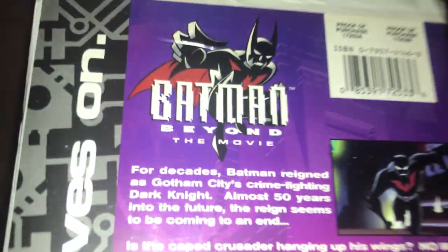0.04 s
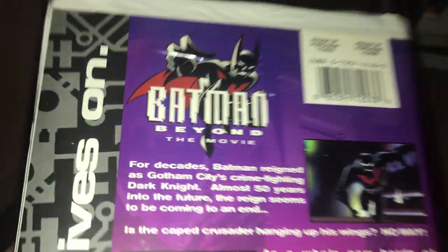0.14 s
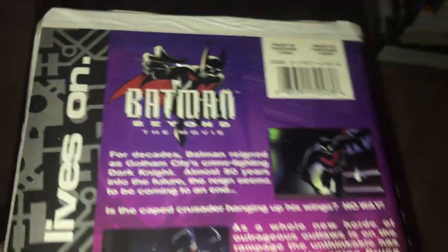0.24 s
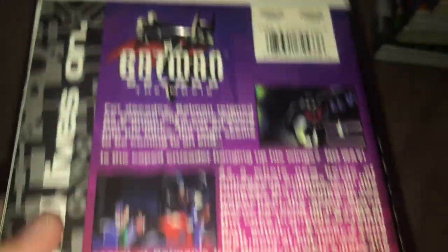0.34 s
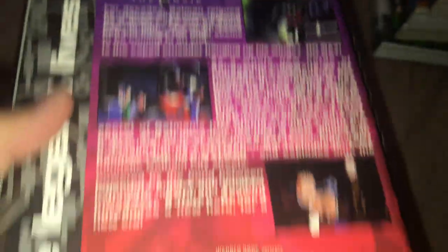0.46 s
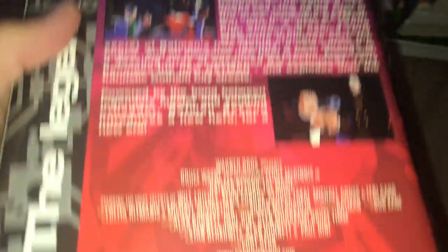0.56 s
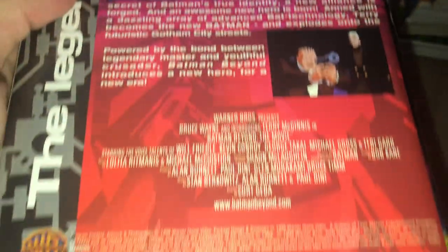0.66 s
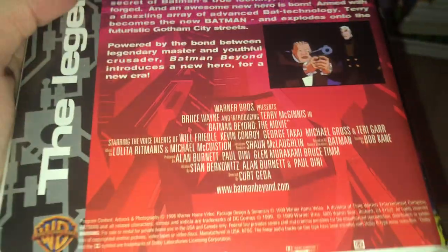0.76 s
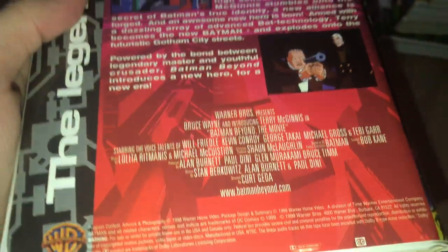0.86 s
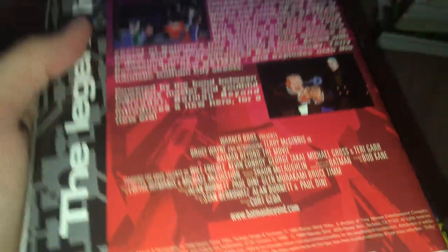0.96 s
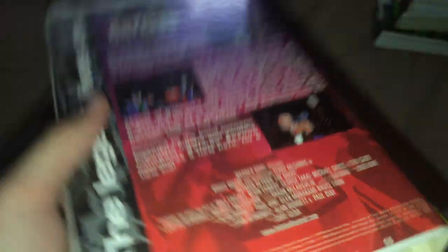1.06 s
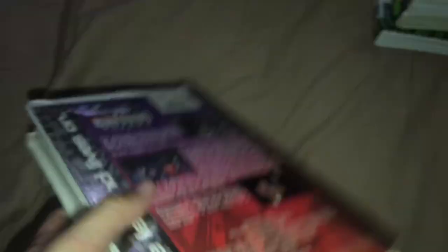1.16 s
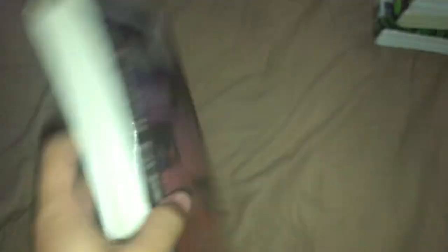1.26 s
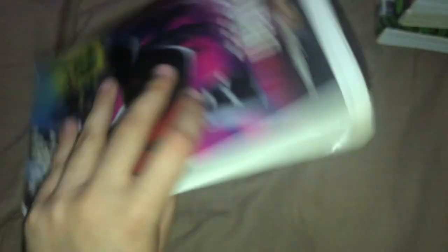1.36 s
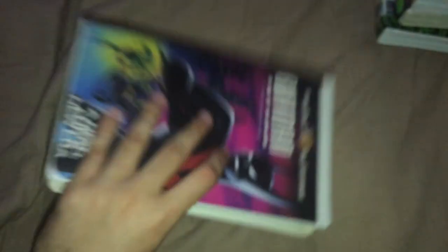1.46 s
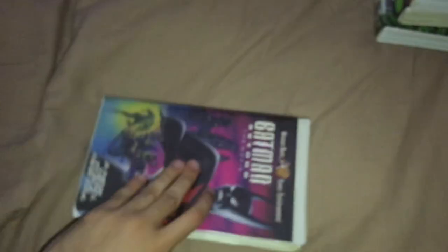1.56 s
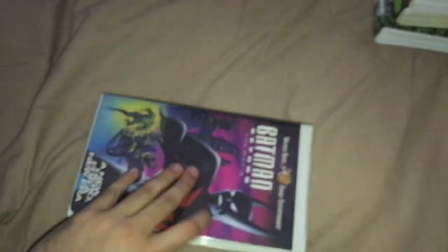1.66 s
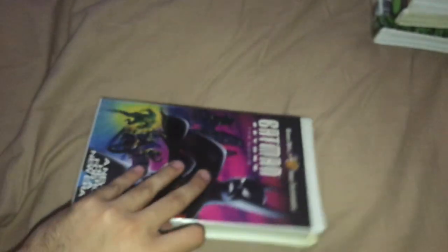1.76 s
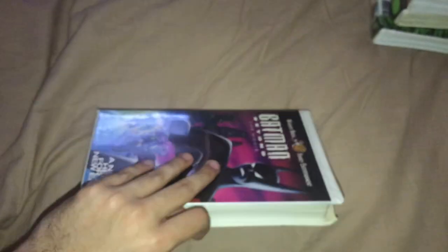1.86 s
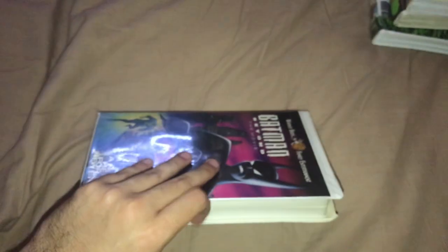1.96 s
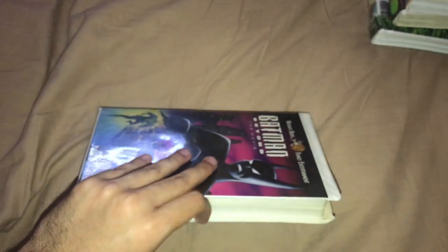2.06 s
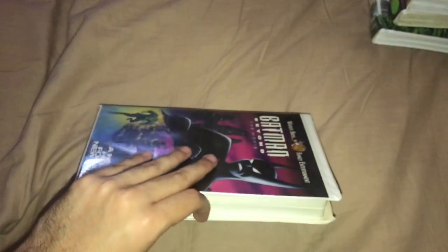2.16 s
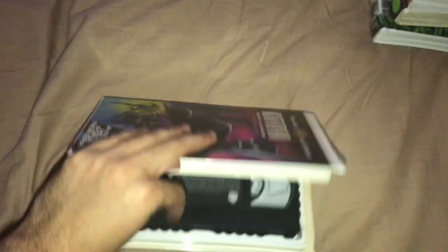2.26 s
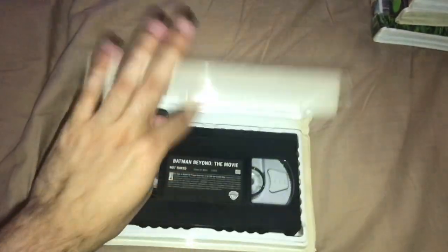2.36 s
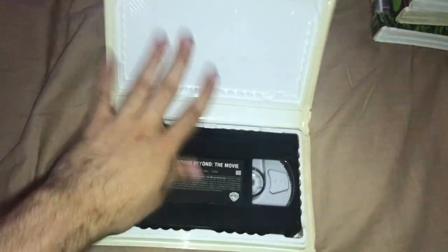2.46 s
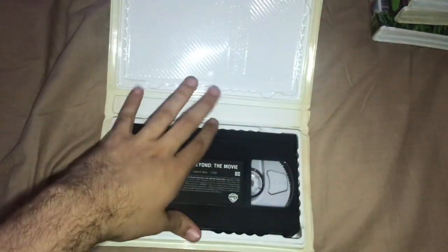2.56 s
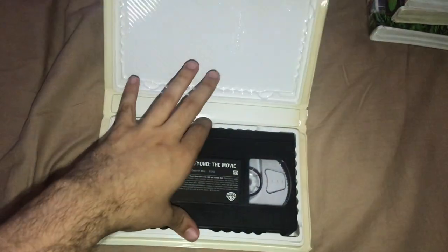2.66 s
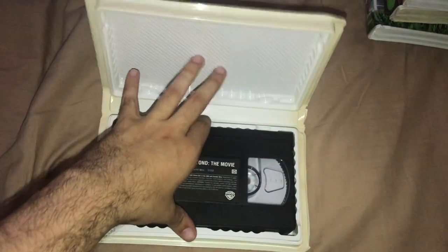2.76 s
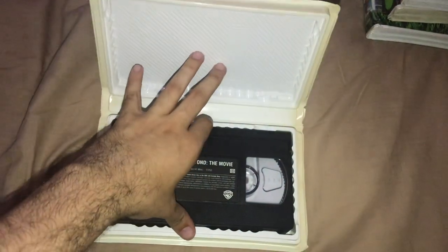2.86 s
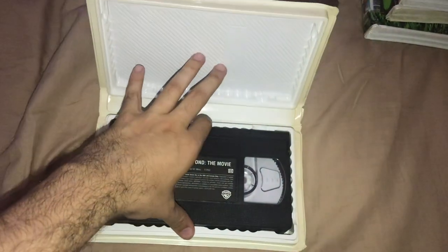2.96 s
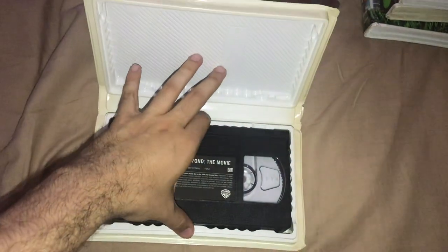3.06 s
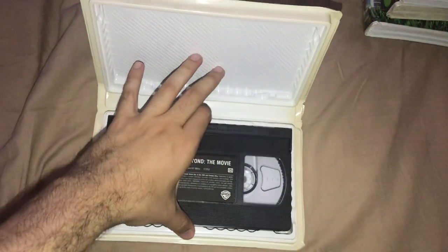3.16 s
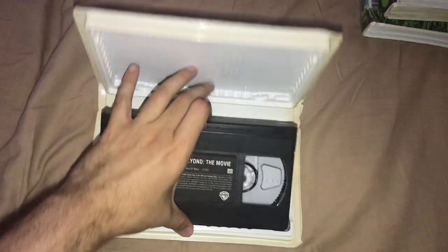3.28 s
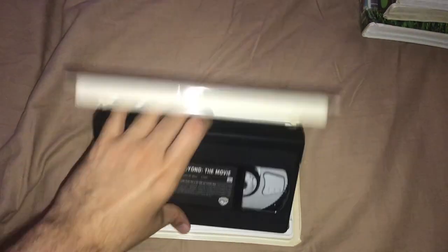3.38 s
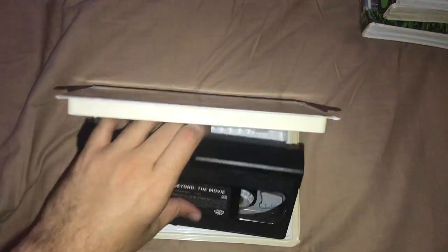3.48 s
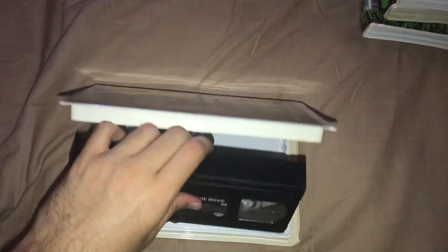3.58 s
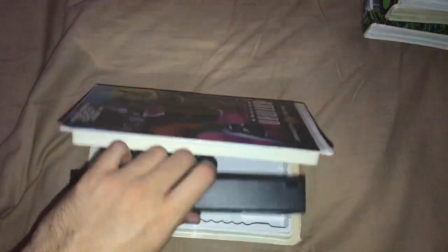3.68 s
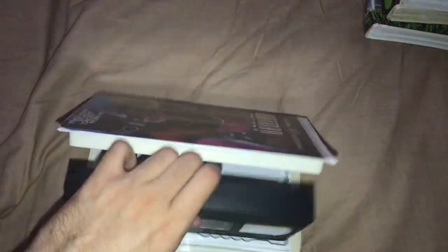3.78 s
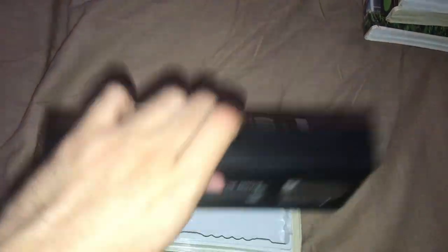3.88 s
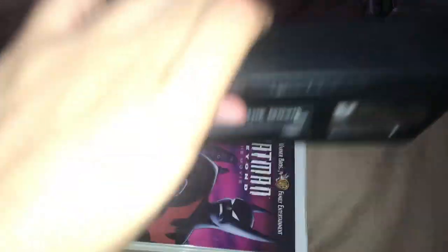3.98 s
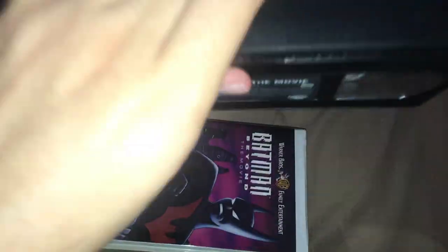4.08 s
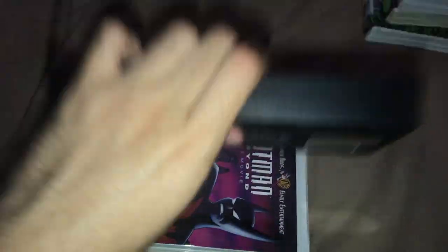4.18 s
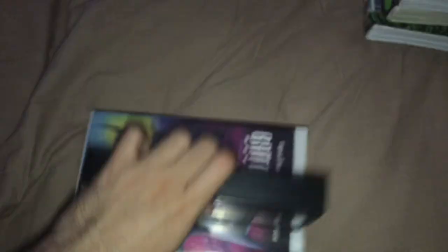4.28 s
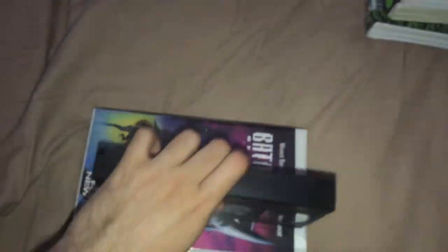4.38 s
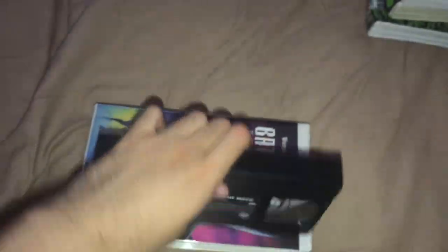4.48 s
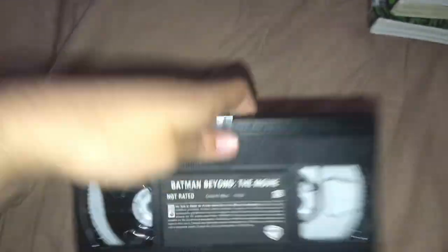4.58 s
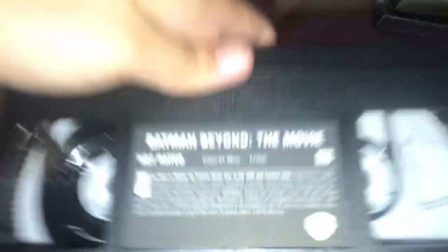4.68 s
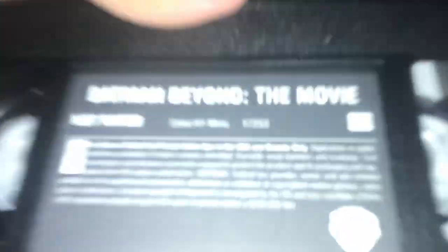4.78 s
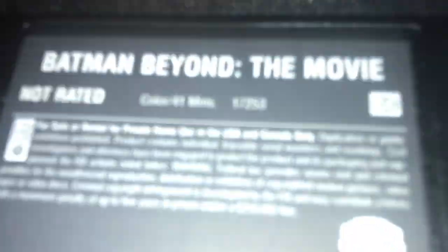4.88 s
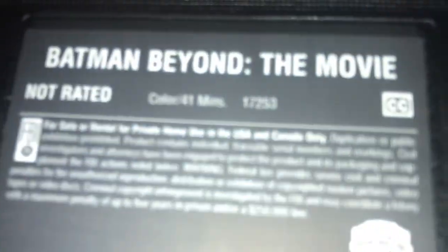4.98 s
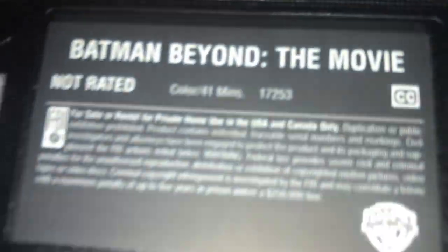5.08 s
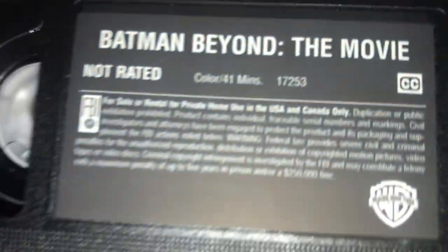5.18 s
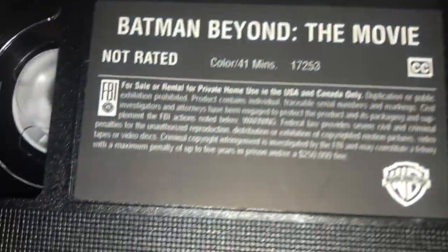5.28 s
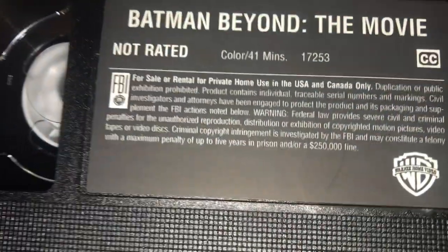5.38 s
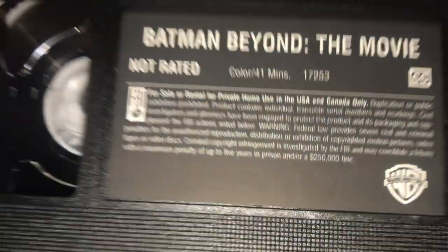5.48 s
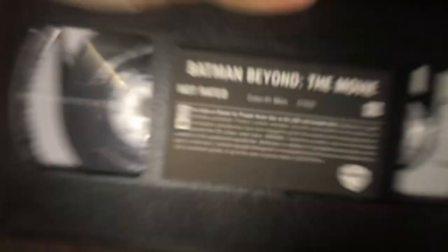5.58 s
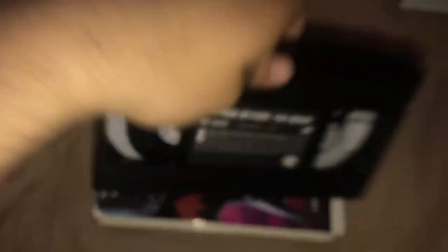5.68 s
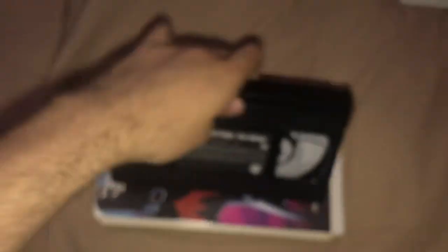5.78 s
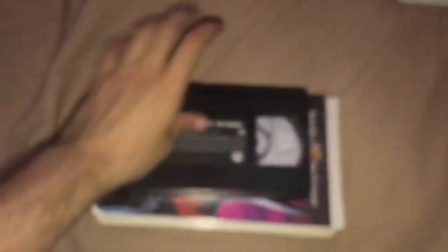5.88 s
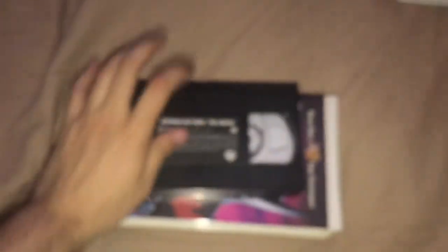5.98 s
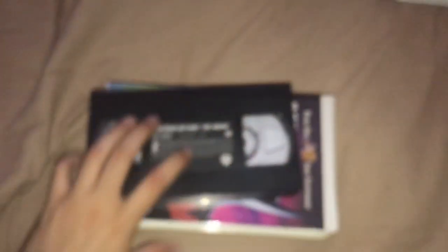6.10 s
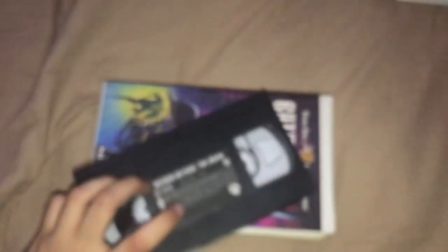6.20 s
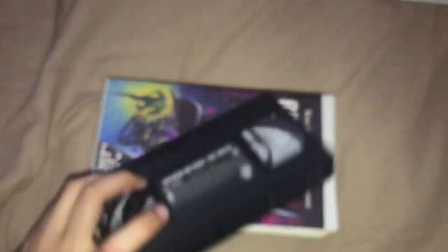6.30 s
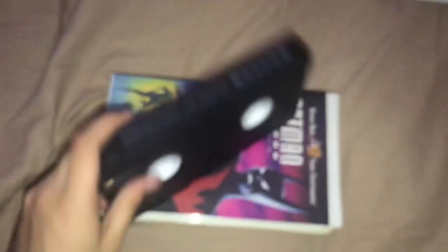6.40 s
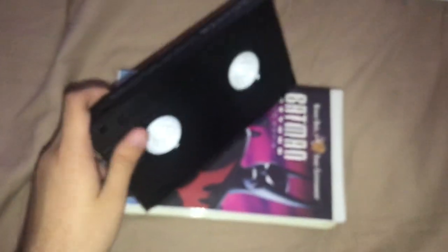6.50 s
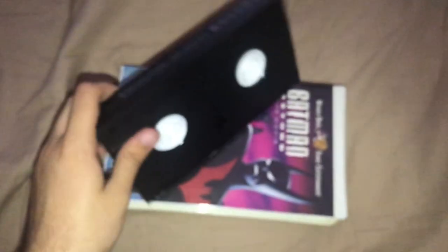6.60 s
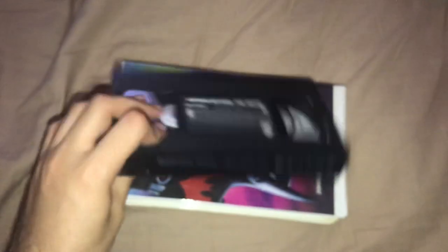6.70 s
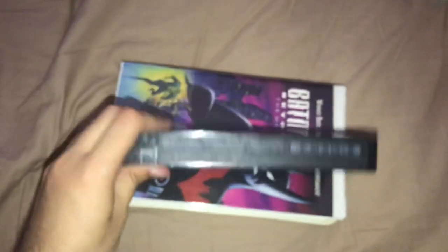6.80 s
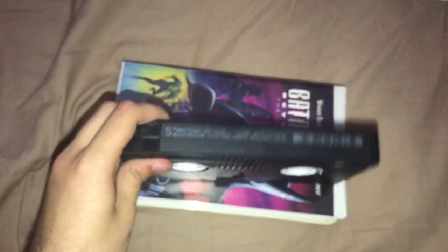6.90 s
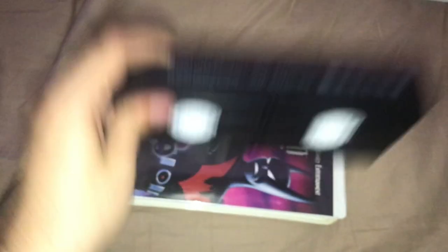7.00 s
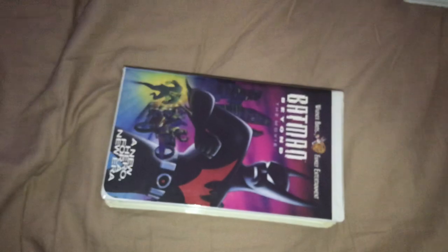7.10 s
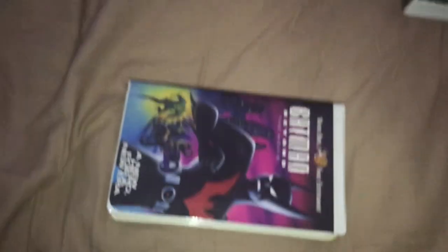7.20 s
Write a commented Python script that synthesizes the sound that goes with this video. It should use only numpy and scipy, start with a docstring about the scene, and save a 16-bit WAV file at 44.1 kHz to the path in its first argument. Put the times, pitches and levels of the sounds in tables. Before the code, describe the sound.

Plastic video case is laid on a bed and popped open, then a cassette is lifted out, knocked on the lid and turned, reels rattling.

```python
"""A low wavering hum and small creaks of gripped plastic come first. On a bed in a small room, a hand lays down
a soft plastic video case, pops it open, pulls out the tape cassette, shuts the lid, and knocks and turns the
cassette on top of it. Each blow is a burst of tiny contacts that excites the damped modes of a plastic shell;
between the blows, friction noise of plastic, skin and cloth swells and ebbs, and loose reels rattle."""
import sys
import numpy as np
from scipy import signal
from scipy.fft import rfft, irfft, next_fast_len
from scipy.io import wavfile
from scipy.ndimage import uniform_filter1d

SR = 44100
rng = np.random.default_rng(int(sys.argv[2]) if len(sys.argv) > 2 else 0)


def file_out(sig):
    """Save sig as 16-bit WAV at sys.argv[1]."""
    # one column per channel
    cols = np.atleast_2d(sig).T
    # limit, then scale
    lim = np.clip(cols, -1, 1)
    pcm = np.round(lim * 32767).astype(np.int16)
    wavfile.write(sys.argv[1], SR, pcm)


N = 319725
TIME = np.arange(N) / SR
RING_TIME = TIME[:8192]
TOP_HZ = 16000

# Blows on the cassette. Each row: start in seconds, contact time in seconds, strength in dB,
# brightness in dB per octave, thud on the mattress in dB re strength.
TAPE_BLOWS = [(3.473, 0.0051, -42.5, 0, -10), (3.495, 0.0094, -34, -.5, -3.5), (3.802, 0.01, -39.5, -1, -8),
              (3.811, 0.0012, -42.5, 4, -29), (4.057, 0.0058, -47, -0.5, -19),
              (4.085, 0.00077, -33, -0.8, -22), (4.38, 0.028, -23, -2.5, -0.5),
              (4.39, 0.0018, -13, -0.66, -9.5), (4.449, 0.0029, -31, -2, -12), (5.87, 0.0018, -25, -3, -3),
              (5.892, 0.0063, -19, -1.5, -7.5), (5.9825, 0.0092, -21.5, 1, -1),
              (6.428, 0.0028, -44, 0.5, -24), (6.464, 0.0032, -29, 2, -38), (6.499, 0.0073, -33, 0.7, -2),
              (6.509, 0.0034, -27, 1.55, -24), (6.54, 0.0027, -32, 0.5, -26),
              (6.749, 0.0032, -27.5, 0.07, -2), (6.758, 0.002, -32.5, 1.3, -4), (6.777, 0.003, -36, 1, -25),
              (6.818, 0.0028, -37, 5, -26), (6.832, 0.0015, -36.5, 2, -35), (6.897, 0.0059, -27, 2, -17),
              (6.9047, 0.0026, -24, 2, -24), (6.921, 0.0039, -35, 1, -4.5), (7.078, 0.0007, -48, 5, -16)]
# Modes of the case, then of the cassette. Each row: frequency in Hz, relative level in dB,
# decay time t60 in seconds; pitch and level scatter around these from blow to blow.
CASE_MODES = [(127, -1.5, 0.11), (283, 7.5, 0.043), (334, 12.5, 0.029), (520, 6, 0.024), (1200, 0.5, 0.17),
              (1460, 11.5, 0.013), (2440, 6.5, 0.09)]
TAPE_MODES = [(256.5, -2, 0.019), (498.5, 6, 0.016), (640, 2, 0.032), (730, -4.5, 0.06), (1728, 1, 0.037),
              (2333, 2, 0.052), (2770, -8, 0.079), (3730, 10.5, 0.02), (3830, -0.5, 0.06)]
# Spectrum of the crowd of short-lived shell modes. Each row: frequency in Hz, relative level in dB.
SHELL = [(80, -18), (300, 2), (560, 9.5), (1000, -6), (1400, 4), (4200, -1), (7000, -12.5), (15500, -16)]
# Ranges of panel, clack and tick at neutral brightness. Each row: low edge in Hz, high edge in Hz.
RANGES = [(270, 840), (1100, 5000), (5000, 16000)]
# After each blow the surfaces skid: delay and spread in s, dB re the blow before the common gains,
# hiss in dB re the scrape before the common gains.
SKID_DELAY_S, SKID_SPREAD_S, SKID_DB, SKID_HISS_DB = 0.016, 0.02, -18, -9.5


def undb(db):
    """Amplitude gain from decibels, by the definition 20 log10."""
    return 10 ** (np.asarray(db) / 20)


def unit(x):
    """Normalisation to unit mean power: rms 1."""
    return x / np.sqrt(np.mean(x ** 2))


def crest(x, db, size=265):
    """Short-time level: the loudest few milliseconds are scaled to this rms level."""
    return x * undb(db) / np.sqrt(uniform_filter1d(x ** 2, size).max())


def band(x, lo_hz, hi_hz, order=3):
    """Causal band-pass with the maximally flat Butterworth response."""
    edges = [lo_hz, min(hi_hz, SR / 2 - 1)]
    return signal.sosfilt(signal.butter(order, edges, "band", fs=SR, output="sos"), x)


def noise(points, count, ripple_db=0):
    """Spectral shaping: white noise filtered to (Hz, dB) points plus chance peaks and valleys, at rms 1."""
    hz, db = np.transpose(points)
    size = next_fast_len(count)
    log_hz = np.log(np.fft.rfftfreq(size, 1 / SR) + 1)
    knots = np.linspace(np.log(200), np.log(TOP_HZ), num=56)
    ripple = np.interp(log_hz, knots, rng.standard_normal(len(knots)))
    gain_db = np.interp(log_hz, np.log(hz), db) + ripple_db * ripple
    spectrum = rfft(rng.standard_normal(size)) * undb(gain_db)
    return unit(irfft(spectrum, size)[:count])


def fade(t, t60):
    """Exponential decay by 60 dB in t60."""
    return np.exp(-np.log(1000) * t / t60)


def linger(x, t60):
    """Energy storage: the envelope of many modes that take up the energy of x and lose it again."""
    keep = fade(1 / SR, t60) ** 2
    return np.sqrt(signal.lfilter([1 - keep], [1, -keep], x ** 2 + 1e-18))


def walk(rate, size=N):
    """Random modulation: straight lines between chance values, rate of them per second, spread near 1."""
    knots = rng.standard_normal(4096)
    return np.interp(TIME[:size] * rate, np.arange(len(knots)), knots)


def add(out, s, sound):
    """Superposition: mix a sound in at s seconds."""
    start = max(int(s * SR), 0)
    out[start:start + len(sound)] += sound[:max(N - start, 0)]


def ring(modes, t, scatter_db, detune):
    """Modal superposition: decaying sines whose strength and pitch shift with the spot struck and the grip."""
    chance = rng.standard_normal((len(modes), 3))
    total = 0
    for (hz, db, t60), (level, shift, sign) in zip(modes, chance):
        amplitude = np.sign(sign) * undb(db + scatter_db * level)
        total = total + amplitude * fade(t, t60) * np.sin(2 * np.pi * hz * (1 + detune * shift) * t)
    return total


def contacts(length, rate=2400, firm_s=0.014, settle_s=0.029):
    """Multiple impact: a first touch, then tiny contacts, weaker for a brief blow, that settle after length."""
    t = RING_TIME
    touches = (rng.random(len(t)) < rate / SR) * rng.uniform(-1.2, 1, len(t))
    force = np.sqrt(abs(length) / firm_s) * touches * fade(np.maximum(t - length, 0), settle_s)
    force[0] = 1
    return force


def background():
    """Stationary noise and modulated tones: steady room air and a hum that wavers in level and phase."""
    # Each row: frequency in Hz, relative level in dB per Hz.
    air_points = [(22, -15), (52, 7), (86, -10), (116, -3), (200, -11), (540, -19), (1000, -29),
                  (3250, -37.5), (14000, -48.5)]
    # Each row: frequency in Hz, mean level in dB.
    hum_tones = [(53.8, -58.5), (118.4, -64)]
    hum = 0
    for hz, db in hum_tones:
        level = undb(db + 2 * walk(7.6)) * np.sqrt(2)
        hum = hum + level * np.sin(2 * np.pi * hz * TIME + 3.8 * walk(14.0))
    air_db = -54.5
    return undb(air_db) * noise(air_points, N) + hum


def bedroom(x, wet_db, bass_t60, treble_t60, treble_db, modes_db, delay_s):
    """Reverberation: soft furnishings leave a short diffuse tail, in which a few standing waves stand out."""
    # Standing waves. Each row: frequency in Hz, relative level in dB before chance scatter, t60 in seconds.
    room_modes = [(334.6, 2.5, 0.12), (500, 3.5, 0.056), (602, 2, 0.22), (717, -1, 0.2), (876, -10, 0.2)]
    out, edges = np.zeros(N), np.geomspace(90, TOP_HZ, num=12)
    for lo, hi, height in zip(edges, edges[1:], np.linspace(0, 1, len(edges) - 1)):
        t60 = bass_t60 + height * (treble_t60 - bass_t60)
        stored = linger(band(x, lo, hi), t60)
        diffuse = unit(band(rng.standard_normal(N), lo, hi))
        add(out, delay_s, undb(wet_db + height * treble_db) * stored * diffuse)
    waves = ring(room_modes, TIME[:SR // 2], scatter_db=4.0, detune=0)
    standing = signal.fftconvolve(x, waves / np.linalg.norm(waves))[:N]
    add(out, delay_s, undb(modes_db) * standing)
    return x + out


def sliding(table, size, lead_s, scrape_db, hiss_db, catch_rate, catch_db, hollow_db, grip_db):
    """Friction: surfaces catch and slip in a gritty scrape that rings the shell, with a smoother hiss."""
    # Colour of the scrape, then of the hiss. Each row: frequency in Hz, relative level in dB per Hz.
    scrape_points = [(150, -6), (400, -3.5), (650, -3), (1000, -2), (2400, 0.5), (4000, -6.5), (6000, -16),
                     (12000, -44)]
    hiss_points = [(2000, -33.5), (5000, -7.5), (8000, -8), (13000, -11.5), (16000, -13.5)]
    out, t = np.zeros(N), TIME[:size]
    panel_modes = [mode for mode in TAPE_MODES if mode[0] < RANGES[0][1]]  # rubbing rings only broad panels
    for s, spread, scrape_level, hiss_level in table:
        start = max(s - lead_s, 0)
        grip = walk(45, size)
        swell = np.exp(-.5 * np.minimum(((start + t - s) / spread) ** 2, 100))
        speed = swell * undb(grip_db * grip)
        catches = (rng.random(size) < catch_rate / SR) * rng.random(size)
        grain = unit(1 + undb(catch_db) * unit(linger(catches, 0.013)))
        # as the grip varies, the contact rolls between two spots, each with its own colour
        here = noise(scrape_points, size, ripple_db=3)
        there = noise(scrape_points, size, ripple_db=3)
        texture = np.cos(grip) * here + np.sin(grip) * there
        friction = undb(scrape_level + scrape_db) * speed * grain * texture
        body = ring(panel_modes, RING_TIME, scatter_db=2, detune=.03)
        body = body * fade(RING_TIME, 0.047)  # the pressing hand damps the shell
        hollow = signal.fftconvolve(friction, body / np.linalg.norm(body))[:size]
        hiss_gain = undb(scrape_level + hiss_level + hiss_db)
        hiss = hiss_gain * speed * np.sqrt(grain) * noise(hiss_points, size)
        add(out, start, friction + undb(hollow_db) * hollow + hiss)
    return out


def skids(table):
    """Residual motion: the short stroke that follows each blow, in proportion to its strength."""
    return [(s + SKID_DELAY_S, SKID_SPREAD_S, db + SKID_DB, SKID_HISS_DB) for s, _, db, _, _ in table]


def squeaks(arch, jitter_rate):
    """Stick-slip of skin on plastic: pitch rises and falls with the slip speed and jitters with the grip."""
    # Each row: middle in seconds, spread in seconds, level in dB of the tone before its swell,
    # pitch at full speed in Hz, roughness as a share of that pitch.
    squeak_rows = [(2.043, 0.0073, -55, 1500, 0.03), (2.054, 0.0066, -59, 7260, 0.088),
                   (3.328, 0.017, -50.5, 2370, 0.095)]
    out, t = np.zeros(N), RING_TIME - RING_TIME[-1] / 2
    for s, spread, db, hz, rough in squeak_rows:
        speed = np.exp(-.5 * (t / spread) ** 2)
        pitch = hz * (1 + arch * (speed - 1) + rough * walk(jitter_rate, len(t)))
        tone = unit(np.sin(2 * np.pi * np.cumsum(pitch) / SR))
        add(out, s + t[0], undb(db) * speed * tone)
    return out


def creaks(gain_db, knock_db, t60, contact_s, snap_db):
    """Sudden yielding of gripped plastic: a short dry tick around one pitch and a faint hollow knock."""
    # Each row: start in seconds, peak in dB before the tick and knock gains, centre in Hz.
    creak_rows = [(0.451, -50.5, 1920), (0.618, -57.5, 1800), (0.681, -49.5, 1860), (0.757, -56.5, 1900),
                  (1.226, -51, 2600), (1.253, -44, 2260), (1.291, -46.5, 1990), (1.59, -47.5, 1400),
                  (2.663, -39.5, 3800), (4.28, -46, 1920), (4.348, -46, 2870), (4.676, -46, 3000),
                  (4.813, -39, 2330), (5.014, -38, 1780), (5.235, -41.5, 1860), (5.291, -43, 1630),
                  (5.499, -55, 2000), (5.71, -36, 2160), (5.826, -45.5, 1540), (7.232, -44, 2900)]
    out, t = np.zeros(N), RING_TIME
    for s, db, hz in creak_rows:
        tick = noise(SHELL, len(t)) * linger(contacts(contact_s), t60)
        pitched = band(tick, hz * 0.5, hz * 1.6, order=2)
        add(out, s, crest(pitched + undb(snap_db) * tick, db + gain_db))
        knock = band(ring(CASE_MODES, t, scatter_db=-8.5, detune=0.067), 230, 1000)
        add(out, s, crest(knock, db + knock_db))
    return out


def taps(table, contact_s, t60, ratio):
    """Local resonance: a light contact rings one part of the shell briefly around one pitch."""
    out = np.zeros(N)
    for s, db, hz in table:
        burst = rng.standard_normal(len(RING_TIME)) * linger(contacts(contact_s), t60)
        add(out, s, crest(band(burst, hz / ratio, hz * ratio, order=2), db))
    return out


def reels(gain_db, rate, reel_hz, ratio, click_db, click_rate, click_t60):
    """Random impacts: reels knock in their wells and ring the hollow cassette; their rims click on the shell."""
    # The loose reels rattle while the cassette turns.
    # Each row: time in seconds, level in dB before the common gain; joined by straight lines.
    rattle_levels = [(6.1, -68), (6.38, -61), (6.512, -36), (6.664, -62.5), (6.76, -36.5), (6.892, -41.5),
                     (7.08, -56.5), (7.24, -53.5)]
    times, db = np.transpose(rattle_levels)

    def impacts(per_second):
        """Poisson process: impulses at random times, all of equal strength."""
        return (rng.random(N) < per_second / SR) * 1.0

    knocks, clicks = impacts(rate), impacts(click_rate)
    hollow = unit(band(knocks, reel_hz / ratio, reel_hz * ratio, order=2))
    rims = unit(band(noise(SHELL, N) * linger(clicks, click_t60), 1200, TOP_HZ, order=1))
    level_db = gain_db + np.interp(TIME, times, db, left=-120, right=db[-1])
    return (hollow + undb(click_db) * rims) * undb(level_db)


def case_beneath(gain_db, box_hz, ratio, t60, delay_s):
    """Coupled resonance: the weight of each cassette blow also sounds the hollow case under it."""
    out = np.zeros(N)
    for s, length, db, _, thud_db in TAPE_BLOWS:
        push = rng.standard_normal(len(RING_TIME)) * linger(contacts(length), t60)
        box = band(push, box_hz / ratio, box_hz * ratio, order=2)
        add(out, s + delay_s, crest(box, db + thud_db + gain_db))
    return out


def strengths(db, brightness, thud_db):
    """Spectral tilt: a hard corner favours treble, a fingertip bass; the mattress thud has its own weight."""
    panel_octaves, clack_octaves, tick_octaves = -1.5, 1.64, 3  # distance from the pivot of the tilt
    tick_db = -3.5
    return (db + thud_db, db + brightness * panel_octaves, db + brightness * clack_octaves,
            db + brightness * tick_octaves + tick_db)


def blows(table, modes, modes_db, spot_db, bed_t60, shell_t60s, wall_hz, spot_rise, sink_s, thud_top_hz):
    """Impact excitation: contacts ring the shell; what meets what sets thud, panel, clack and tick."""
    out, t = np.zeros(N), RING_TIME
    ranges = [(50.3, thud_top_hz), *RANGES]  # the thud lies lowest
    range_rise = 0.02  # octaves that all the ranges move up for each dB per octave of brightness
    for s, length, strength_db, brightness, thud_db in table:
        levels = strengths(strength_db, brightness, thud_db)
        spot_hz = wall_hz * 2 ** (spot_rise * brightness)
        starts = (s + sink_s, s, s, s)  # the thud comes as the shell sinks into the mattress
        force = contacts(length)
        response = ring(modes, t, scatter_db=-2.0, detune=0.044)
        tones = unit(signal.fftconvolve(force, response)[:len(t)])
        crowd = noise(SHELL, len(t), ripple_db=3.5)
        for edges, start, db, t60 in zip(ranges, starts, levels, shell_t60s):
            # the crowd of shell modes stores the contacts' energy, for a time of its own in each range
            sound = unit(crowd * linger(force, t60)) + undb(modes_db) * tones
            # the struck spot adds a broad resonance of its own: low on a flat wall, high on a corner
            sound = sound + undb(spot_db) * band(sound, spot_hz / 1.12, spot_hz * 1.12, order=1)
            damped = sound * fade(t, bed_t60)  # the mattress and the hand soak up the ringing
            lo_hz, hi_hz = np.multiply(edges, 2 ** (range_rise * brightness))
            add(out, start, crest(band(damped, lo_hz, hi_hz), db))
    return out


def scene():
    """Superposition of case, cassette and hand, with the response of the room and its background."""
    # Blows on the case, from laying it down to the lid falling shut. Each row: start in seconds,
    # contact time in seconds, strength in dB, brightness in dB per octave, mattress thud in dB re strength.
    case_blows = [(1.616, 0.0088, -39.5, -0.6, 10.5), (1.642, 0.0074, -33, -3, 6.5),
                  (1.708, 0.00075, -37, -1.5, -23), (1.847, .0017, -45.5, 0.8, 3.5),
                  (1.891, 0.0071, -40.5, 0.5, -4.5), (2.163, 0.027, -36, -0.84, -24),
                  (2.175, 0.00066, -51, 5.5, -2), (2.287, 0.029, -49.5, -8.5, -3),
                  (2.306, 0.014, -34.5, -1.5, -4), (2.384, 0.009, -28.5, -0.55, -3.5),
                  (2.453, 0.0045, -32, 0.5, 0), (2.556, 0.0057, -48, -0.9, -9),
                  (2.641, 0.013, -40, -0.5, -6.5), (2.854, 0.0038, -45.5, 0.06, 7.5),
                  (3.226, 0.0085, -30, -2.2, -22), (3.705, 0.001, -34.5, 0, -2.5),
                  (3.763, 0.0094, -42.5, 0.4, -1), (3.824, 0.0012, -29.5, 1, -20),
                  (3.832, 0.01, -36, 0.6, -8.5)]
    # Sliding strokes of plastic, skin and cloth. Each row: middle in seconds, spread in seconds,
    # scrape in dB, hiss in dB re scrape, both before the common gains.
    strokes = [(.11, 0.019, -74.5, 7), (.46, 0.042, -73.5, -4), (1.21, 0.025, -77.5, 8.5),
               (1.33, 0.022, -67, -8), (1.459, 0.014, -66, -23), (1.63, 0.016, -48.5, -7),
               (2.048, 0.0075, -58.5, -4), (2.296, 0.0089, -43.5, 1.5), (2.41, 0.059, -59, -3),
               (3.3, 0.19, -71, -4), (3.346, 0.0085, -39.5, 4), (3.62, 0.22, -66, 2.5),
               (3.879, 0.011, -42.5, -5), (4.66, 0.069, -63.5, 3), (4.815, 0.017, -53.5, -8.5),
               (6.263, 0.064, -55.5, 5.5), (6.47, 0.038, -52.5, 4.5), (6.84, 0.05, -44, -11),
               (7.15, 0.31, -67.5, 0)]
    # Stiff plastic edges flick past each other; the rows at 1.743, 4.694 and 4.779 s are brief fingertip
    # squeaks, # each ringing at one pitch. Each row: start in seconds, peak in dB, ringing in Hz.
    snaps = [(1.641, -34.5, 1470), (1.743, -47.5, 1400), (2.307, -30.5, 2470), (3.226, -32.5, 1510),
             (3.502, -33.5, 2140), (3.704, -27.5, 1670), (3.824, -23.5, 1680), (4.694, -53.5, 2240),
             (4.779, -53.5, 2250)]
    # Soft hollow knocks as case or cassette rocks. Each row: start in seconds, peak in dB, pitch in Hz.
    rocking_knocks = [(1.351, -46, 405), (6.15, -44, 407), (6.367, -47.5, 547)]

    case = blows(case_blows, CASE_MODES, modes_db=-3.0, spot_db=-45.0, bed_t60=0.04,
                 shell_t60s=(0.83, 0.03, 0.053, 0.018), wall_hz=1730, spot_rise=0.043,
                 sink_s=0.00472, thud_top_hz=167)
    tape = blows(TAPE_BLOWS, TAPE_MODES, modes_db=-4.5, spot_db=4.0, bed_t60=0.14,
                 shell_t60s=(0.046, 0.058, 0.041, 0.015), wall_hz=2620, spot_rise=0.15,
                 sink_s=.008, thud_top_hz=214)
    slide = sliding(strokes, size=SR, lead_s=.5, scrape_db=3.5, hiss_db=-2.5, catch_rate=110,
                    catch_db=-4.0, hollow_db=-10.5, grip_db=3.5)
    skid = sliding(skids([*case_blows, *TAPE_BLOWS]), size=8192, lead_s=SKID_DELAY_S, scrape_db=-1.0,
                   hiss_db=-2.5, catch_rate=250, catch_db=-4.0, hollow_db=-13.5, grip_db=-1.0)
    handling = case + tape + slide + skid
    handling = handling + creaks(gain_db=-5.0, knock_db=-10.5, t60=0.019, contact_s=0.00089, snap_db=1.5)
    handling = handling + taps(snaps, contact_s=0.0015, t60=0.011, ratio=1.11)
    handling = handling + taps(rocking_knocks, contact_s=0.0046, t60=0.026, ratio=1.26)
    handling = handling + squeaks(arch=0.37, jitter_rate=1200)
    handling = handling + reels(gain_db=-6.5, rate=77, reel_hz=697, ratio=1.136,
                                click_db=-4, click_rate=64, click_t60=0.016)
    handling = handling + case_beneath(gain_db=-4.5, box_hz=358, ratio=1.3, t60=0.025, delay_s=0.00065)
    room = bedroom(handling, wet_db=-11.5, bass_t60=0.24, treble_t60=0.32, treble_db=-2.5,
                   modes_db=-23.5, delay_s=.006)
    return (room + background())[None]


def record(dry):
    """Band limitation: a gentle high-pass drops the deepest bass and a steep low-pass cuts the top."""
    dry = signal.sosfilt(signal.butter(2, 28, "high", fs=SR, output="sos"), dry)
    return signal.sosfilt(signal.ellip(8, .2, 70, TOP_HZ, fs=SR, output="sos"), dry)


dry = scene()
out = record(dry)
file_out(out)
```